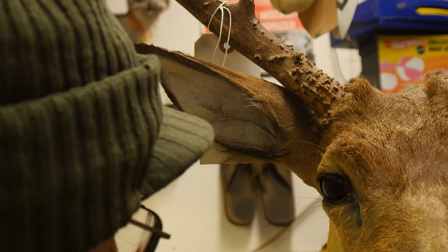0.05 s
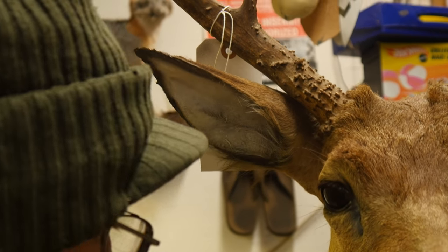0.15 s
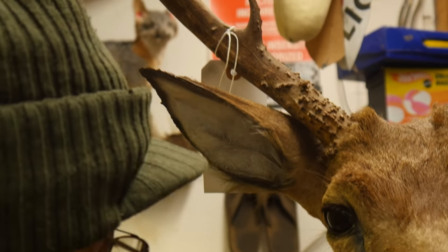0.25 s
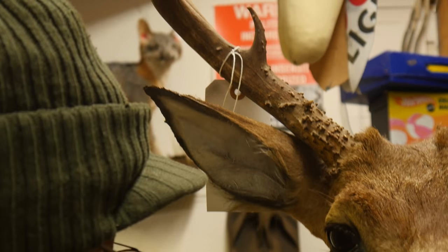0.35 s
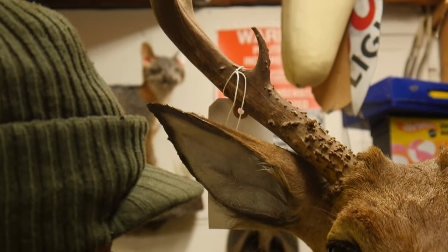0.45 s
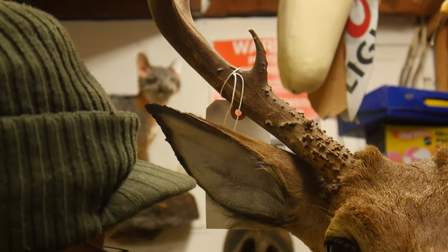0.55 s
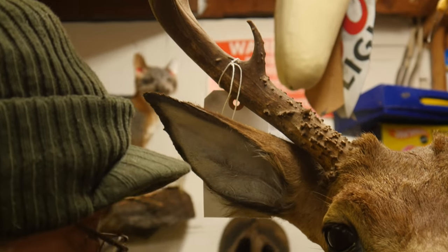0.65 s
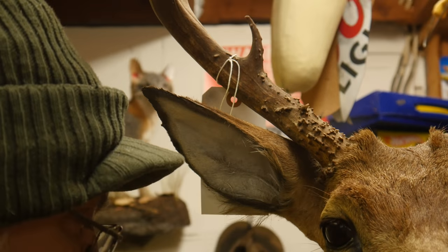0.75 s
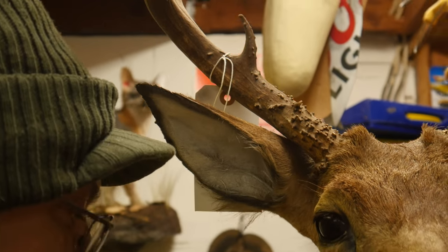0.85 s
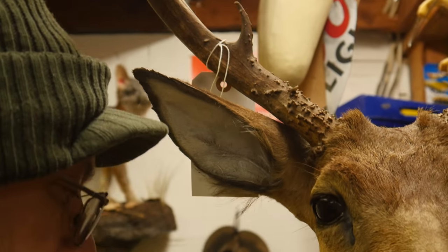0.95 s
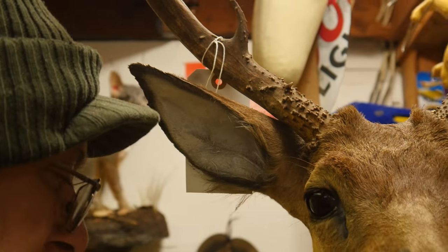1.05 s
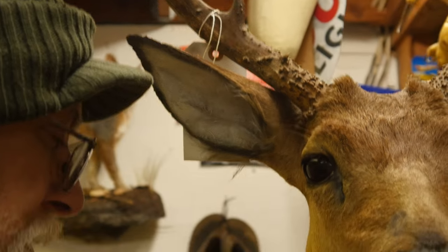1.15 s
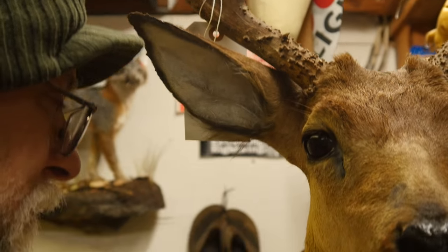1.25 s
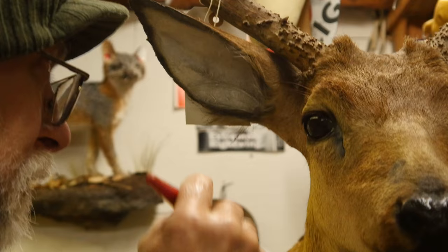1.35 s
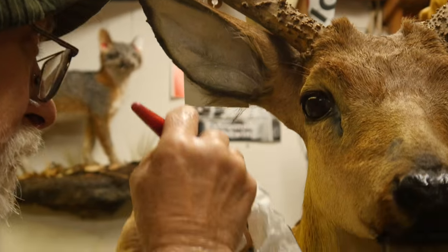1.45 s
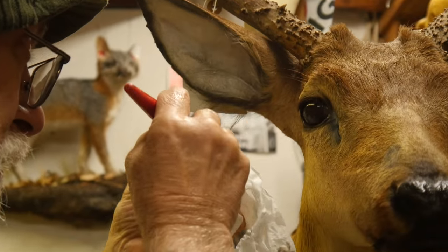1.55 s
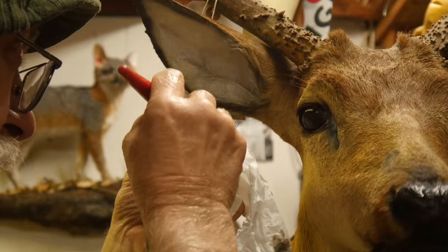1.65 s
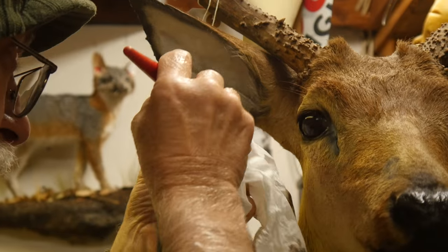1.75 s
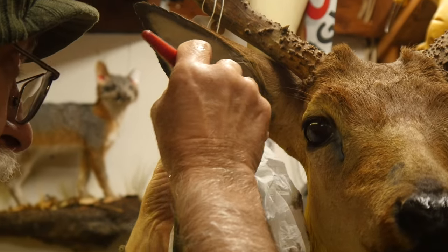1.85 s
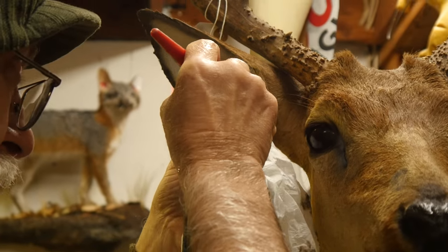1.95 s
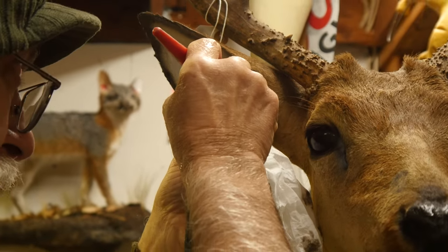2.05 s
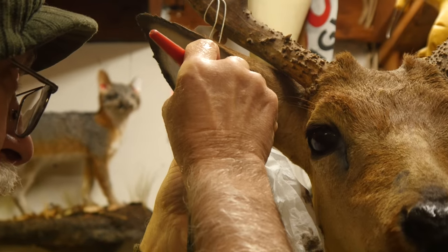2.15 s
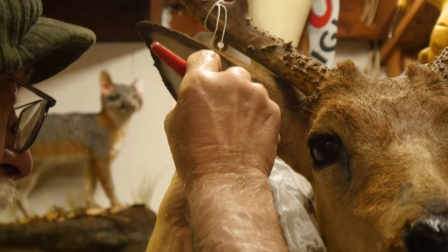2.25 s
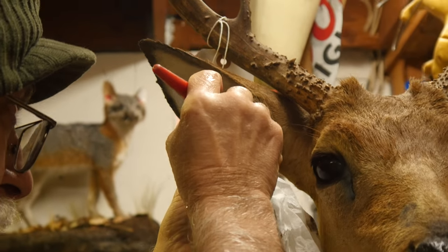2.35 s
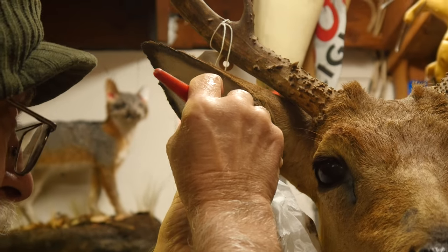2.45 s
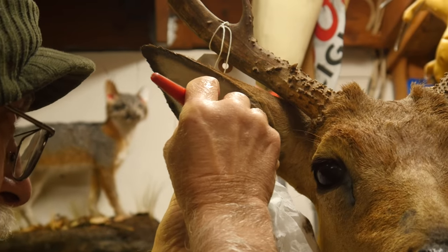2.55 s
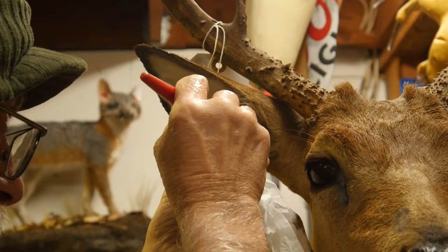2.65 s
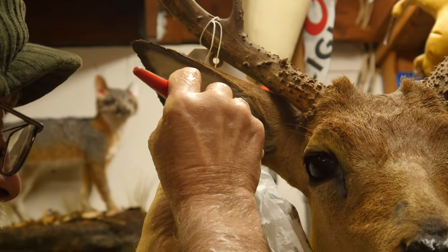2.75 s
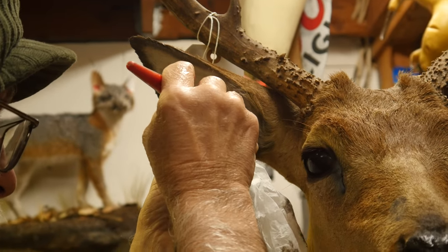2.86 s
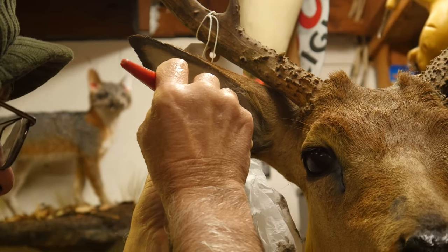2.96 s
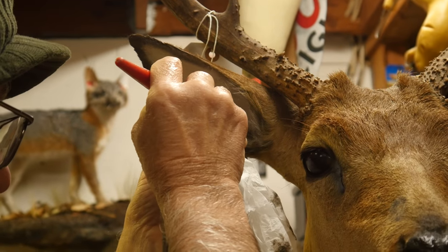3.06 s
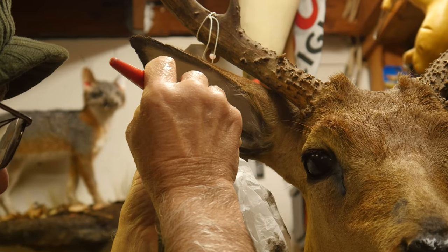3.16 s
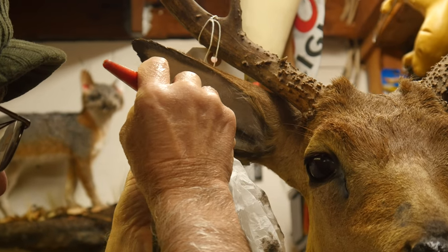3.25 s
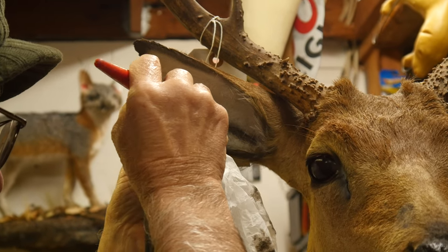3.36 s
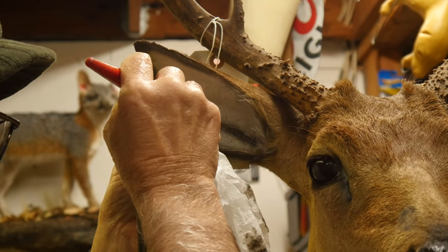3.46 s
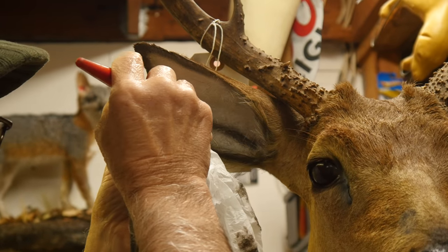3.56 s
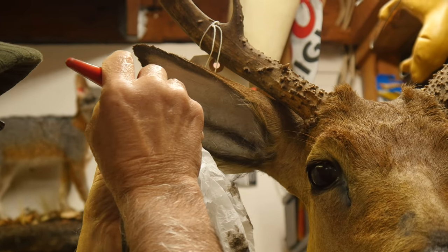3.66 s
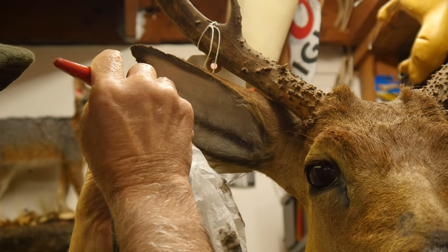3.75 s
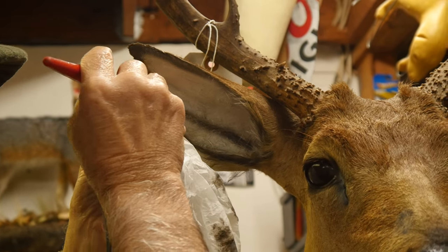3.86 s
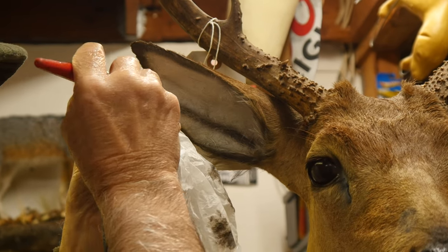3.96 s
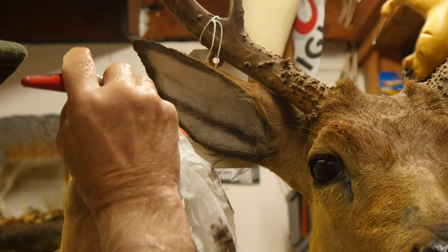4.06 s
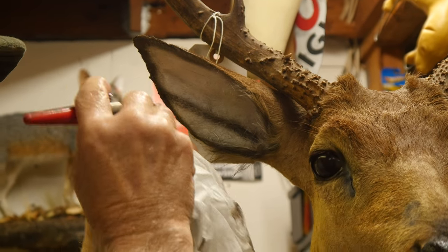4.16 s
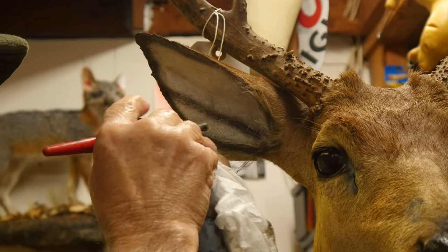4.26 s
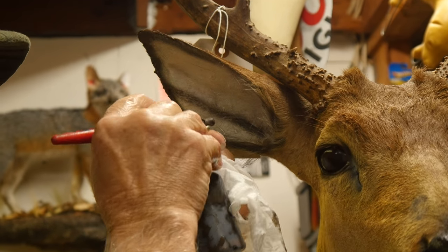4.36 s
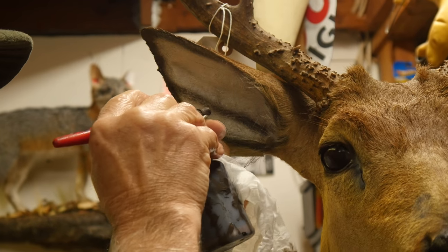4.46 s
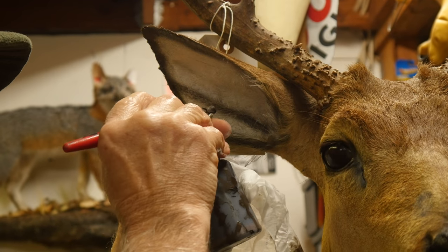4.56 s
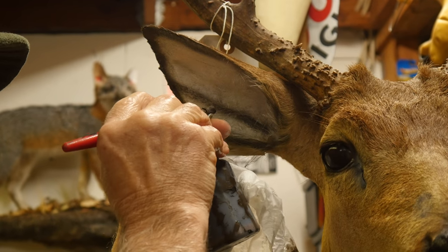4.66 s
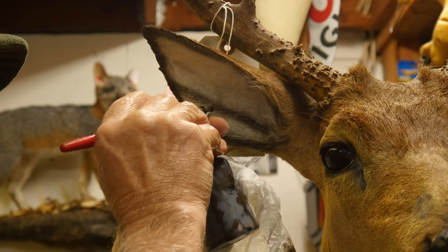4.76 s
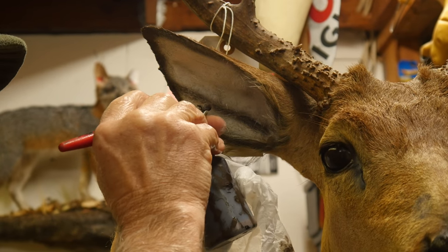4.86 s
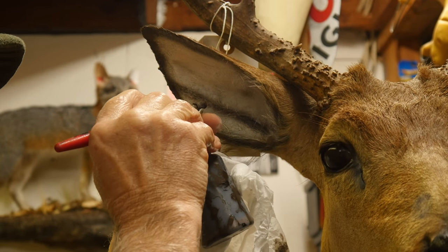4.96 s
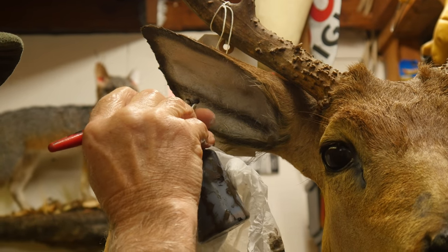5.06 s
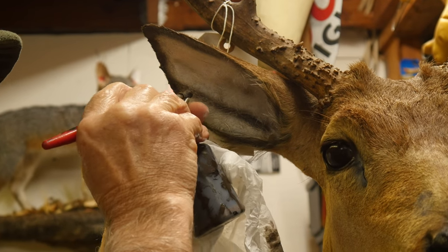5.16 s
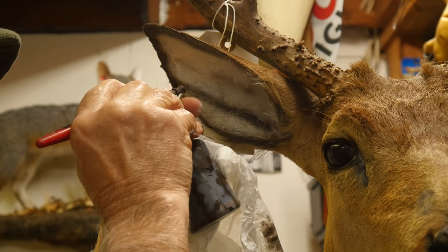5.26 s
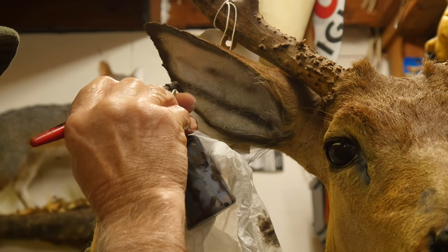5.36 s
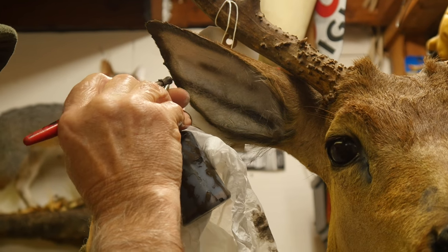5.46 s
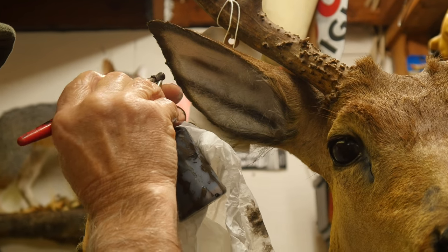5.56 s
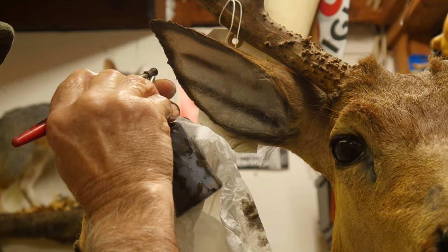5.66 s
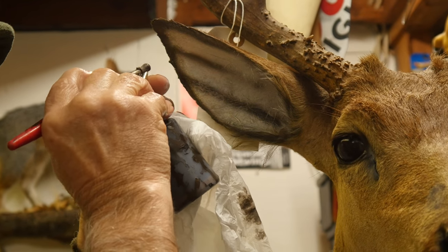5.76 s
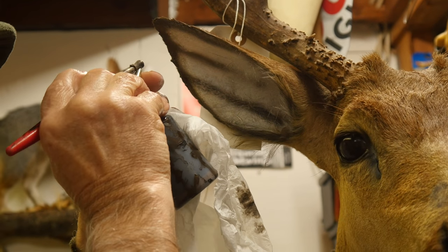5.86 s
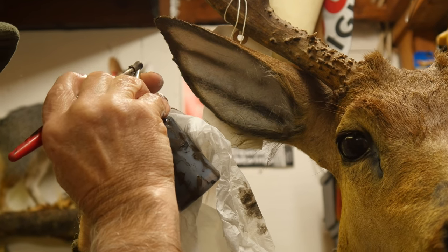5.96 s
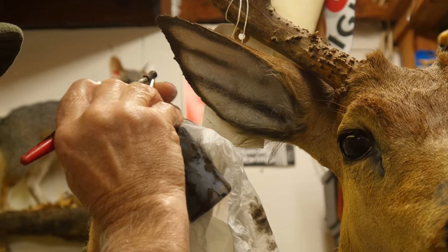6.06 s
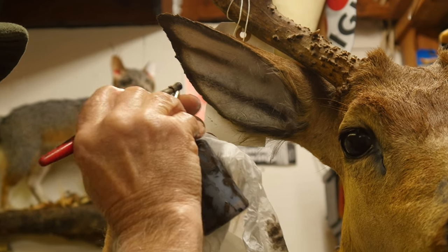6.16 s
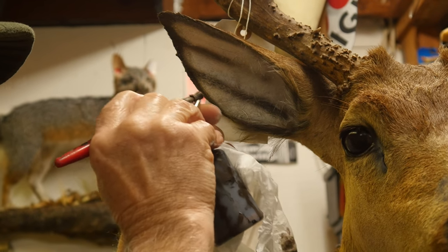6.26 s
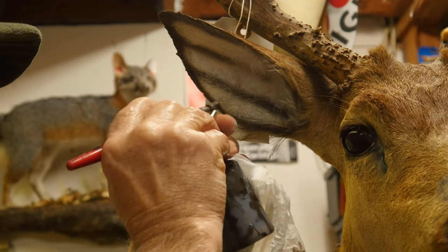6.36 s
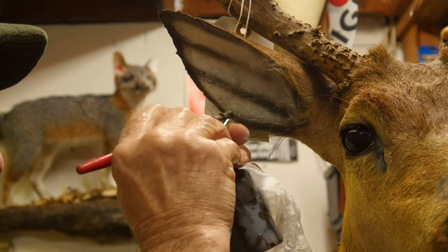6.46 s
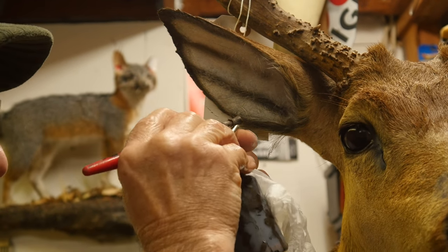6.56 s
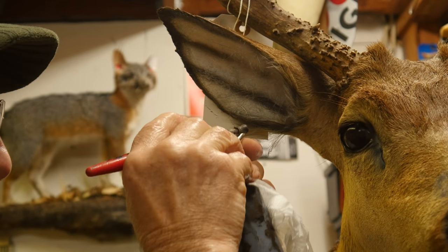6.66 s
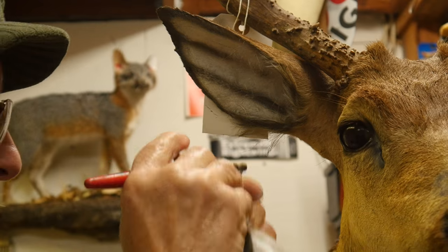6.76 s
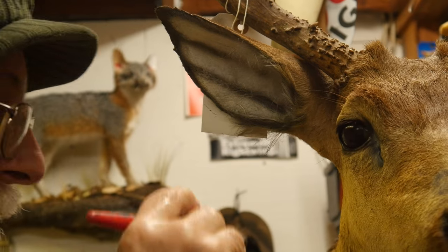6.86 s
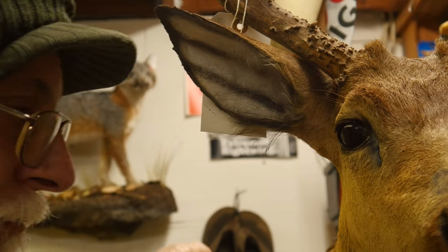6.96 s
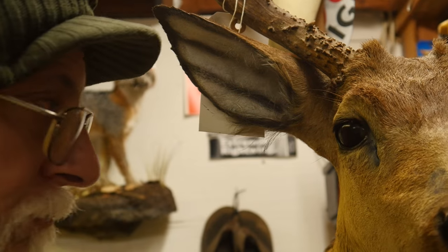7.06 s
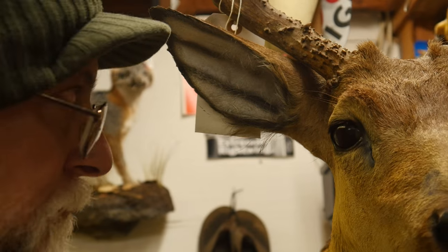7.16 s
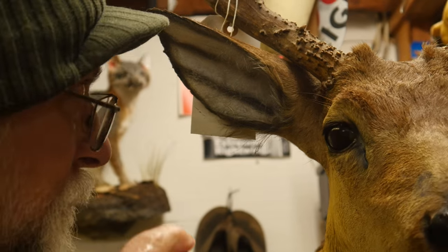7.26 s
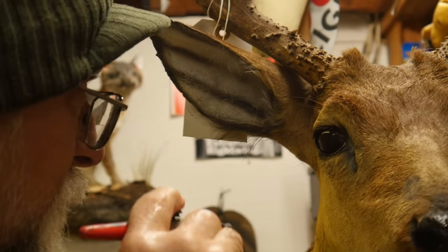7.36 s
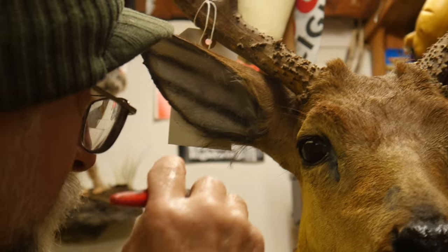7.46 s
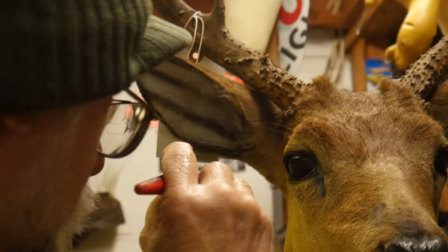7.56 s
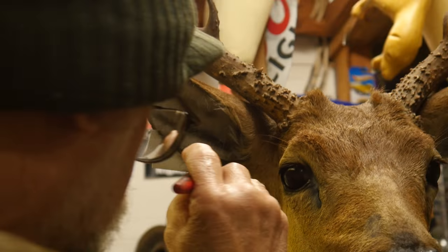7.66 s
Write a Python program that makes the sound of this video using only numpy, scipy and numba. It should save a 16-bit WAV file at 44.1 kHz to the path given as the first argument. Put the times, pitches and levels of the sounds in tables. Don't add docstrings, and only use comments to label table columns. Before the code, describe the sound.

An airbrush fires a short puff, then two long hissing bursts with a hollow roar, amid faint cloth rustles and small ticks in a quiet workshop.

```python
import sys
import numpy as np
from scipy import signal
from scipy.fft import rfft, irfft, next_fast_len
from scipy.io import wavfile
from scipy.ndimage import map_coordinates
from numba import njit

SR = 44100
rng = np.random.default_rng(int(sys.argv[2]) if len(sys.argv) > 2 else 0)


def volts_from_db(level):
    exponent = np.asarray(level, float) / 20
    return 10 ** exponent


def generate_wav(sig):
    pcm = np.round(np.clip(np.atleast_2d(sig).T, -1, 1) * 32767).astype(np.int16)
    wavfile.write(sys.argv[1], SR, pcm)


N = 340011

# frequency in Hz, density in dB per Hz.
ROOM_TONE = [(20, -9), (33, -10), (45, -22), (60, -6.5), (120, -15.5), (170, -12.5), (290, -13), (450, -16),
             (900, -19), (2200, -22.5), (3300, -16), (4200, -24.5), (6000, -26), (9000, -26), (15800, -25)]
# frequency in Hz, level in dB.
HUM_LINES = [(59.2, -95), (118.4, -75), (360.7, -74.5), (479.1, -66.5), (721.4, -76)]
# start in seconds, length in seconds, level in dB, darkness in dB.
STROKES = [(0, 0.074, -53.5, -3), (0.119, 0.059, -50.5, -1), (0.263, 0.089, -52, 0),
           (0.41, 0.12, -56.5, -11), (0.596, 0.13, -56.5, -9), (0.973, 0.064, -56, -3),
           (1.123, 0.05, -54, -1), (1.216, 0.21, -54.5, 3.5), (1.504, 0.11, -56.5, 1), (1.717, .1, -49, 1),
           (1.87, 0.029, -55.5, 7), (1.96, 0.056, -59, 9.5), (2.067, 0.091, -56.5, 6),
           (2.255, 0.086, -61.5, 0), (4.064, 0.047, -61, 6.5), (4.192, 0.093, -56, 4),
           (4.36, 0.025, -63, 13), (4.5, 0.078, -66, 11), (6.73, 0.13, -63, 0), (6.95, 0.091, -62.5, -11),
           (7.118, 0.045, -47.5, 2), (7.191, 0.028, -44.5, 7), (7.264, 0.041, -54, -5),
           (7.35, 0.052, -59, 2), (7.434, 0.023, -51, 6), (7.503, .05, -64, 0), (7.618, .05, -58, 5)]
# centre in Hz, width in Hz, level in dB.
RUSTLE_MODES = [(3400, 1600, 12), (4600, 8100, 8), (2600, 930, -9)]
RUSTLE_LOW_MODES = [(1070, 1900, -1.5), (1910, 460, 15.5)]
# start in seconds, peak in dB, ring in Hz.
TICKS = [(0.018, -39, 3590), (0.247, -30, 1750), (0.264, -35, 1930), (0.292, -35, 1960), (0.322, -38, 3310),
         (0.354, -36, 3660), (0.376, -37, 3280), (1.212, -38, 1840), (1.224, -33, 3340), (1.256, -40, 3110),
         (1.397, -38, 5200), (1.404, -38, 6100), (1.498, -33, 3470), (1.523, -31, 2930), (1.726, -36, 2640),
         (1.801, -34, 1870), (1.868, -35, 1770), (4.375, -41, 3470), (4.546, -42, 2120), (4.583, -42, 2040),
         (4.628, -42, 3330), (4.641, -37, 3130), (6.939, -44, 3230), (6.974, -45, 3280), (7.07, -45, 2400),
         (7.086, -41, 845), (7.188, -26, 3460), (7.204, -27, 1690), (7.213, -29, 1740), (7.224, -30, 1850)]
# start in seconds, peak in dB, ring
# in Hz.
KNOCKS = [(.247, -42, 402), (1.192, -52, 86.1), (1.36, -50, 107), (1.516, -41, 148), (1.556, -39.5, 149),
          (1.758, -47, 88), (2.233, -42, 295), (2.243, -38, 127), (2.29, -46, 154), (2.33, -46, 300),
          (7.108, -38.5, 354), (7.172, -46, 265), (6.54, -45, 130), (7.619, -39, 420)]
# opening in seconds, length in seconds, rise in ms, easing off in seconds.
BURSTS = [
    (0.729, 0.11, 6.8, .012),
    (2.359, 1.576, 47, 0.029),
    (4.787, 1.813, 9.2, 0.05),
]
# time in seconds, air flow in dB, jet on the ear in dB,
# upper mode in Hz, depth into the hollow from 0 to 1.
SPRAY = [
    [(.73, -23, -20, 3100, 0.52), (.85, -26, -22, 3150, 0.64)],
    [(2.4, -32, -37, 2600, 0.36), (2.52, -36, -26.5, 3030, 0.34), (2.61, -34, -34.5, 3200, 0.37),
     (2.67, -29, -28, 3240, 0.17), (2.91, -33.5, -34, 3780, 0.22), (3.36, -32.5, -30, 3800, 0.4),
     (3.44, -26, -29.5, 3020, 0.57), (3.6, -27.5, -30, 2730, 0.64), (3.8, -26, -19, 2700, 0.79)],
    [(4.8, -25, -33, 2860, .01), (4.87, -23.5, -32, 2870, .01), (5.19, -25, -33, 2820, 0.05),
     (5.3, -25.5, -29.5, 2800, 0.25), (5.62, -24, -30, 2240, 0.36), (5.96, -26.5, -21.5, 1960, 0.89),
     (6.13, -25, -32, 2650, 0.54), (6.35, -23.5, -32.5, 3200, 0.14), (6.61, -22, -31.5, 2400, 0.22)],
]
# frequency in Hz, density in dB per Hz.
HISS = [(4000, -4), (5000, -0.5), (6500, 1.5), (8000, -4), (9000, -5.5), (11000, -2), (13000, -0.5),
        (16000, 2)]
# time in seconds, delay in ms, echo strength, lower hiss share in
# dB.
HISS_ECHO = [(.8, .4, 0.063, 3.5), (2.4, 0.38, 0.27, -37), (2.6, 0.39, 0.21, -8), (2.86, 0.39, 0.13, -4),
             (2.97, 0.2, 0.099, -1.5), (3.2, .24, 0.39, 1.5), (3.5, 0.29, 0.081, -3.5), (3.96, .255, 0.08, -3),
             (4.8, .37, 0.23, -5), (5.2, 0.4, 0.072, -5.5), (5.4, 0.34, 0.048, -3.5), (5.65, 0.36, .11, -5.5),
             (5.95, 0.4, 0.15, -2), (6.15, 0.37, 0.091, -4.5), (6.65, 0.39, 0.24, -5.5)]
# lower mode share in dB, lower mode in Hz, ridge share in dB,
# ridge fading in dB per second, cancelling from 0 to 1.
HOLLOW = [
    (-13.5, 1850, -2.5, 7, 0.15),
    (-4.5, 1570, 4, 17, 0.48),
    (-10, 1180, -13, 3, 0.3),
]
# frequency in Hz, density in dB per Hz.
RUMBLE = [(100, -30.5), (200, -19.5), (350, -8.5), (600, -9), (900, -4), (1300, -1.5), (2000, -55)]
# start in seconds, length in seconds, level in dB.
LEAKS = [
    (.9, 0.087, -49),
    (1.154, .08, -66),
    (2.454, 0.92, -37.5),
    (4.805, .04, -47.5),
]
# centre in Hz, width in Hz, level in dB.
BORE_MODES = [(5350, 800, -7), (8220, 170, 0.5), (11040, 650, -0.5), (13000, 450, -11.5)]
# level at its start in dB, change in dB per second.
SQUEAK_PARTIALS = [(-55.5, -85), (-80, 141)]
# delay in ms, strength.
EARLY_ECHOES = [(1.4, 0.083), (2.3, 0.0028), (3.7, 0.024), (5.899, 0.0016)]


def rms_one(x):
    return x / np.sqrt(np.mean(x ** 2) + 1e-20)


def in_time(rows):
    s, *columns = np.transpose(rows)
    return [np.interp(np.arange(N) / SR, s, c) for c in columns]


def per_pull(values):
    opens = np.array(BURSTS)[:, 0] * SR
    pull = np.searchsorted(opens, np.arange(N)) - 1
    return np.asarray(values)[np.maximum(pull, 0)]


def held(start_s, length_s, rise_db_per_s, fall_db_per_s):
    t = np.arange(N) / SR
    before = np.maximum(start_s - t, 0)
    after = np.maximum(t - start_s - length_s, 0)
    return -rise_db_per_s * before - fall_db_per_s * after


def coloured(points):
    hz, db = np.transpose(points)
    size = next_fast_len(N)
    grid_hz = np.maximum(np.arange(size // 2 + 1) * SR / size, 1)
    shape = volts_from_db(np.interp(np.log(grid_hz), np.log(hz), db, left=-70, right=-70))
    return rms_one(irfft(rfft(rng.standard_normal(size)) * shape, size)[:N])


def band(x, lo_hz, hi_hz, order=2):
    return signal.sosfilt(signal.butter(order, [lo_hz, hi_hz], "band", fs=SR, output="sos"), x)


def drift(rate_hz):
    r = np.exp(-80 * np.pi * rate_hz / SR)
    slow = signal.lfilter([1], [1, -2 * r, r * r], rng.standard_normal(N // 40 + 2002))[2000:]
    return np.interp(np.arange(N) / 40, np.arange(len(slow)), rms_one(slow))


@njit
def resonate(x, turn, r):
    y = np.zeros(len(x))
    for i in range(2, len(x)):
        drive = (1 - r[i] ** 2) / 2 * (x[i] - x[i - 2])
        y[i] = drive + 2 * r[i] * np.cos(turn[i]) * y[i - 1] - r[i] ** 2 * y[i - 2]
    return y


def mode(x, hz, width_hz):
    each = np.zeros(len(x))
    return resonate(x, each + 2 * np.pi * hz / SR, each + np.exp(-np.pi * width_hz / SR))


def echo(x, ms):
    late = np.clip(ms, .05, 9) * SR / 1000
    return map_coordinates(x, [np.arange(N) - late], order=3)


def room_tone():
    t = np.arange(N) / SR
    hum = sum(volts_from_db(db + 2.0 + .6 * drift(3.6)) * np.sin(2 * np.pi * hz * t + k)
              for k, (hz, db) in enumerate(HUM_LINES))
    steady_db, walk_db, walk_s, walk_length_s = -65.5, -62, 1.6, 1.96
    shake = volts_from_db(steady_db) + volts_from_db(walk_db + held(walk_s, walk_length_s, 35, 66))
    shake = shake * coloured([(7, -25), (11, -9), (15, -1), (20, -6.0), (26, -23), (34, -26)])
    return volts_from_db(-58) * coloured(ROOM_TONE) + hum + shake


def fold_modes(rub, modes):
    return sum((-1) ** k * volts_from_db(db + 1.5 * drift(8)) * mode(rub, hz, width_hz)
               for k, (hz, width_hz, db) in enumerate(modes))


def rustle():
    rise_db_per_s, fall_db_per_s, fidget_db = 485, 208, -88
    dull_db, crisp_db, low_db = -7, -8, -11
    level, dark_sum = volts_from_db(fidget_db), 0
    for s, length_s, db, dark in STROKES:
        gain = volts_from_db(db + held(s, length_s, rise_db_per_s, fall_db_per_s))
        level = level + gain
        dark_sum = dark_sum + gain * dark
    dark_db = dark_sum / level

    born = rng.random(N) < 900 * volts_from_db(4.0 * drift(35)) / SR
    size = volts_from_db(1.3 * np.minimum(rng.exponential(1, N), 4))
    grains = born * size * rng.choice([-1, 1], N)
    rub = 1.07 * rms_one(grains) + rng.standard_normal(N) * volts_from_db(0.59 * drift(29))

    body = rms_one(band(fold_modes(rub, RUSTLE_MODES), 1430, 3630))
    low = volts_from_db(low_db + dark_db) * rms_one(band(fold_modes(rub, RUSTLE_LOW_MODES), 560, 2460))
    dull = volts_from_db(dull_db + 0.3 * dark_db) * rms_one(band(rub, 200, 1280))
    crisp = volts_from_db(crisp_db - 0.54 * dark_db) * rms_one(band(rub, 3100, 8400, order=1))
    return level * (body + low + dull + crisp)


def taps(events, cycles, crack_hz, crack_db, snap_db, trim_db):
    out, t = np.zeros(N + 4410), np.arange(4410) / SR
    for s, db, hz in events:
        noise = rng.standard_normal(4410)
        ring = np.sin(2 * np.pi * hz * t) * volts_from_db(-60 * t * hz / cycles)
        crack = volts_from_db(crack_db) * band(noise, *crack_hz) * volts_from_db(-80 * t * crack_hz[0] / cycles)
        snap = volts_from_db(snap_db) * band(noise, 4200, 9500) * volts_from_db(-60 * t / 0.0081)
        out[round(s * SR):][:4410] += volts_from_db(db + trim_db) * (ring + crack + snap)
    return out[:N]


def ticks():
    return taps(TICKS, cycles=28, crack_hz=(1300, 4300), crack_db=7, snap_db=-15, trim_db=-4)


def knocks():
    return taps(KNOCKS, cycles=9.6, crack_hz=(120, 380), crack_db=13, snap_db=-41, trim_db=-1)


def valve():
    t = np.arange(N) / SR
    ease_db_per_s, shut_db_per_s = 191, 600
    flow = np.zeros(N)
    for s, length_s, rise_ms, easing_s in BURSTS:
        build = 1 - np.exp(-np.clip(t - s, 0, 1) * 1000 / rise_ms)
        ease_db = held(s, length_s, 0, ease_db_per_s)
        shut_db = held(s, length_s + easing_s, 0, shut_db_per_s)
        flow += build * volts_from_db(ease_db + shut_db)
    return flow


def nozzle():
    flow_db = in_time(np.concatenate(SPRAY))[0]
    delay_ms, strength, lower_db = in_time(HISS_ECHO)
    hiss = coloured(HISS)
    hiss = hiss + 1.4 * strength * echo(hiss, delay_ms) + .15 * echo(hiss, .62 + .06 * drift(1.2))
    upper = rms_one(band(hiss, 6570, 22000, order=4)) * volts_from_db(.5 * drift(25))
    lower = rms_one(band(hiss, 3480, 9020, order=4)) * volts_from_db(lower_db + 0.29 * drift(22))
    return volts_from_db(flow_db + 0.41 * drift(2.4)) * (upper + lower)


def ear():
    flow_db, upper_db, upper_hz, depth = in_time(np.concatenate(SPRAY))
    share_db, open_hz, ridge_db, fading_db_per_s, cancel = per_pull(HOLLOW).T
    since_s = np.maximum(np.arange(N) / SR - per_pull(BURSTS)[:, 0], 0)
    first, second, third = rng.standard_normal((3, N))
    buffet_db = 0.8 * drift(14)

    wide_hz, narrow_hz, sink_hz = 3200, 700, 270
    width_hz = wide_hz * (narrow_hz / wide_hz) ** depth
    lower_hz = open_hz - sink_hz * depth

    moving = mode(first, upper_hz, width_hz) / np.sqrt(width_hz / 1000)
    ridge = mode(mode(third, 3230, 520), 3230, 520)
    ridge = ridge - .8 * (1 - depth) * mode(mode(third, 4450, 700), 4450, 700)
    ridge_db = np.maximum(ridge_db - fading_db_per_s * since_s, -7)
    upper = (moving + volts_from_db(ridge_db) * 1.24 * ridge) / np.sqrt(1 + volts_from_db(2 * ridge_db))
    upper = volts_from_db(0.081 * drift(40)) * rms_one(band(upper, 1590, 4560))

    lower = mode(mode(second, lower_hz, 1380), lower_hz, 1380) + 0.61 * band(second, 1350, 3100)
    lead_db, lead_s = per_pull([0, 6, 0]), .12
    lag_db = .28 * (upper_db - flow_db)
    lower_db = share_db + lead_db * np.exp(-since_s / lead_s) - lag_db
    lower = volts_from_db(lower_db + .8 * drift(6) + .5 * drift(30)) * rms_one(band(lower, 630, 2570))

    hollow = volts_from_db(upper_db + buffet_db) * (upper + lower)
    hollow = hollow - cancel * (0.32 + depth) * mode(hollow, 1.35 * lower_hz, 580)
    rumble_db = flow_db - 22 + 15.5 * depth + buffet_db + 0.5 * drift(15)
    return hollow + volts_from_db(rumble_db) * coloured(RUMBLE)


def leak():
    rise_db_per_s, fall_db_per_s = 221, 900
    seep = sum(volts_from_db(db + held(s, length_s, rise_db_per_s, fall_db_per_s)) for s, length_s, db in LEAKS)
    air = rng.standard_normal(N)
    whistle = sum(volts_from_db(db) * mode(air, hz, width_hz) for hz, width_hz, db in BORE_MODES)
    return seep * rms_one(whistle + 0.32 * band(air, 8200, 10000))


def squeak():
    start_s, length_s, pitch_hz, scoop_hz, scoop_s = 2.185, .19, 705, 70, .04
    since_s = np.clip(np.arange(N) / SR - start_s, -.03, length_s)
    phase = 2 * np.pi * np.cumsum(pitch_hz - scoop_hz * np.exp(-since_s / scoop_s)) / SR
    tone = sum(volts_from_db(db + slope * since_s) * np.sin((k + 1) * phase)
               for k, (db, slope) in enumerate(SQUEAK_PARTIALS))
    return volts_from_db(held(start_s, length_s, 700, 700) + 2.0 * drift(25)) * tone


def early(x):
    total = x + sum(strength * echo(x, ms + 0.053 * drift(0.11)) for ms, strength in EARLY_ECHOES)
    return total / np.sqrt(1 + sum(strength ** 2 for ms, strength in EARLY_ECHOES))


def workshop(x):
    t60_s, tail_db = 0.29, -15
    t = np.arange(int(.5 * SR)) / SR
    tail = rng.standard_normal(len(t)) * volts_from_db(-60 * t / t60_s) * (t > .006)
    tail = band(tail, 240, 8200, order=1)
    return volts_from_db(tail_db) * signal.fftconvolve(x, tail / np.sqrt(np.sum(tail ** 2)))[:N]


def scene():
    spray = valve() * (nozzle() + ear()) + leak()
    near = early(rustle() + spray) + ticks() + knocks()
    return np.tile(near + workshop(near) + squeak() + room_tone(), (2, 1))


def band_limit(x):
    return signal.sosfilt(signal.butter(12, 16960, fs=SR, output="sos"), x)


def record(dry):
    cut = signal.sosfilt(signal.ellip(14, .1, 80, 15790, fs=SR, output="sos"), dry)
    return band_limit(cut)


dry = scene()
out = record(dry)
generate_wav(out)
```